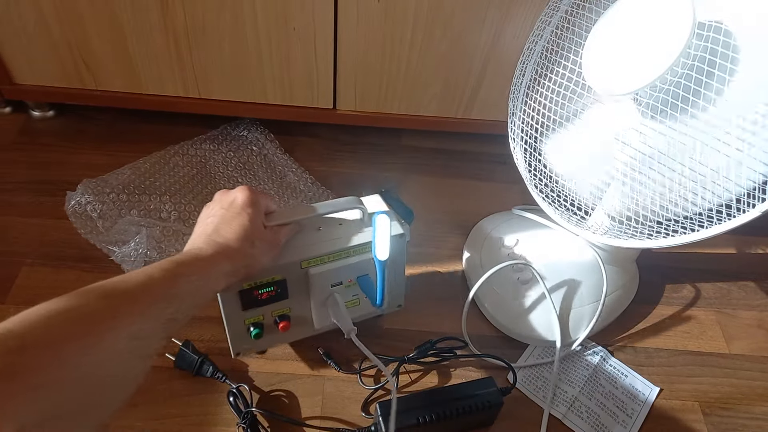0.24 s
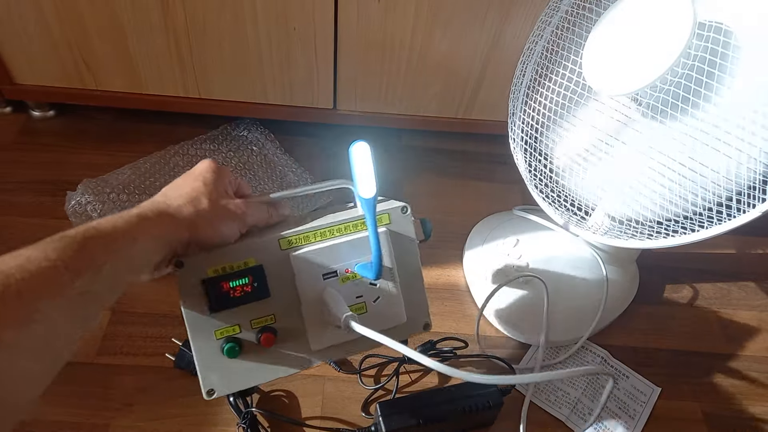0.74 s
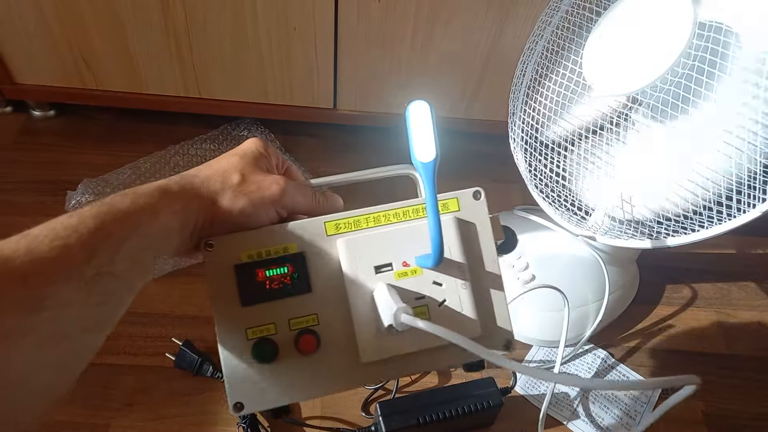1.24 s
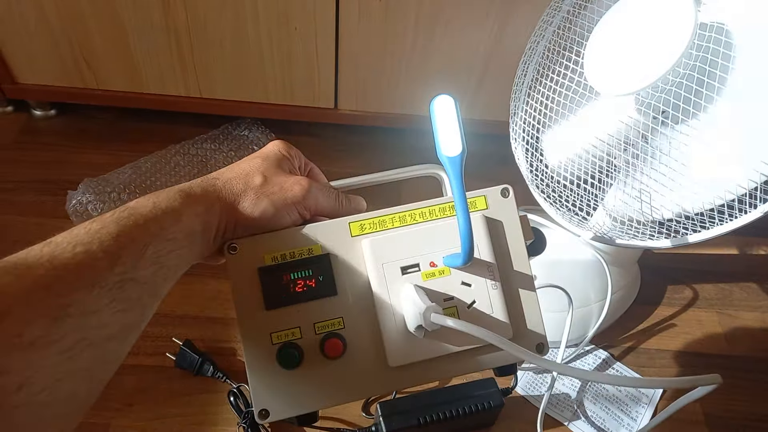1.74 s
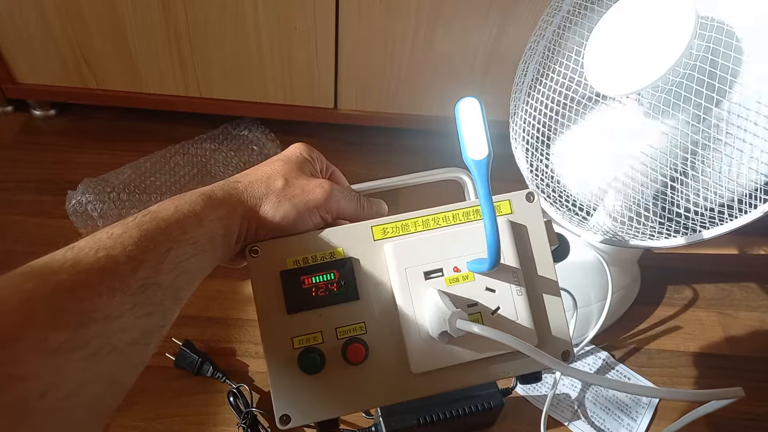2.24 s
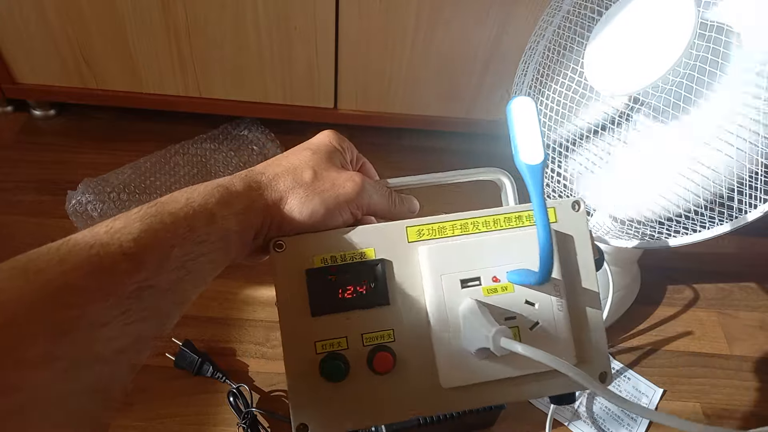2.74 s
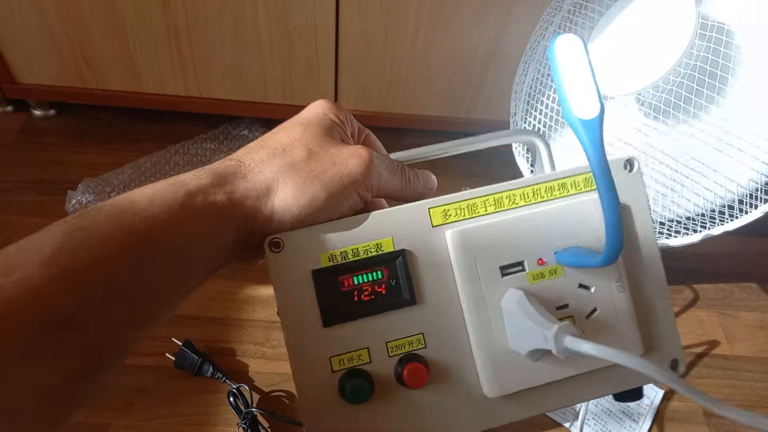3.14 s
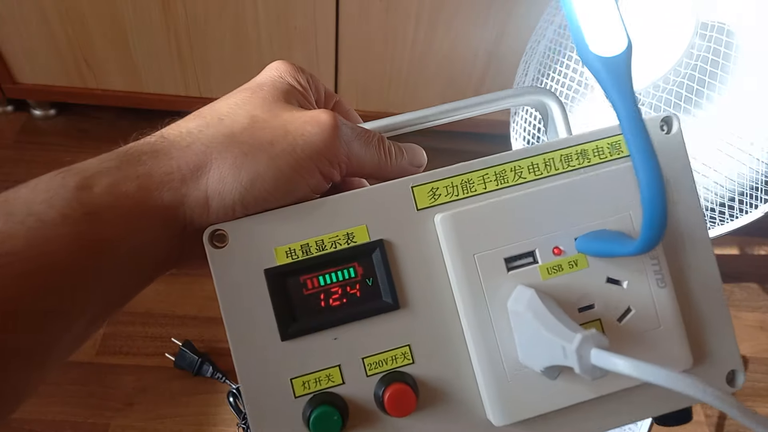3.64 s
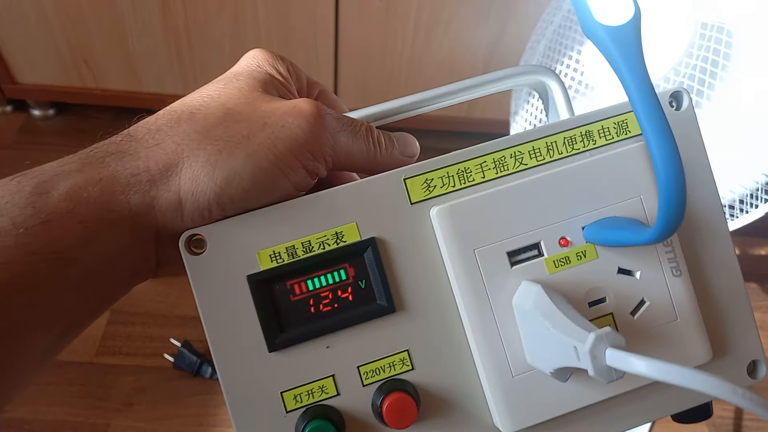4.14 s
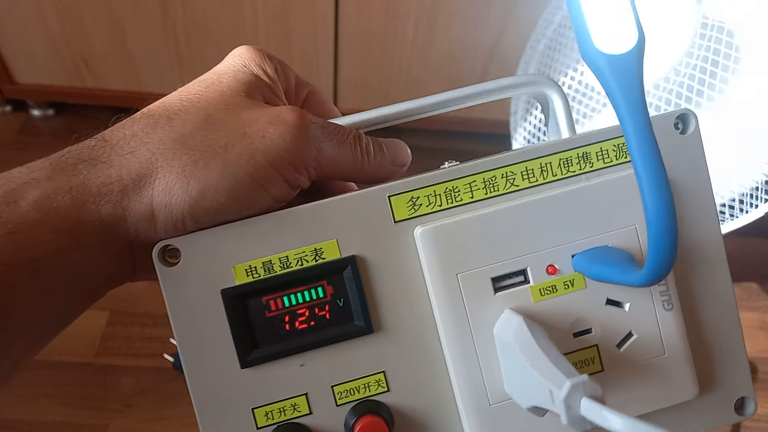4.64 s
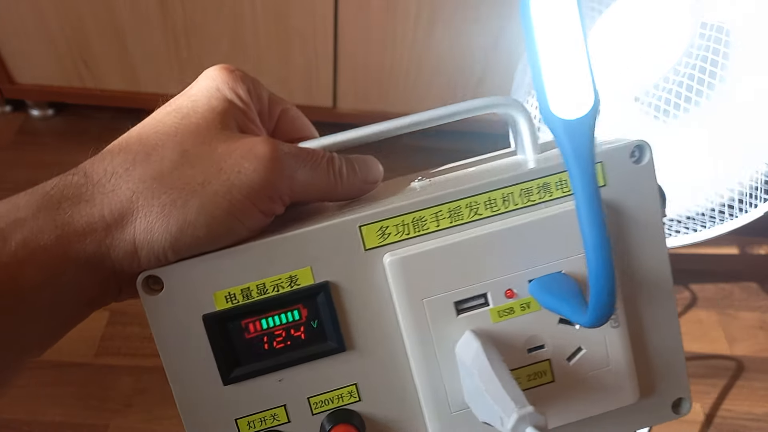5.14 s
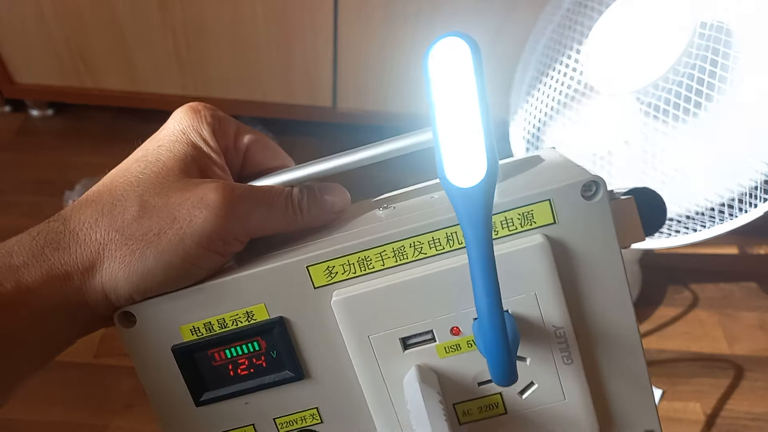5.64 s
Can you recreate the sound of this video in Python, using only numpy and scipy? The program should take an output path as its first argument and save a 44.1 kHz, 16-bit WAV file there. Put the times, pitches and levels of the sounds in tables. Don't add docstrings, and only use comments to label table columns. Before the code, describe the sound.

A small electric desk fan runs throughout in an indoor room, heard close on a hand-held stereo microphone. Its motor gives a low, nearly constant buzz around 300 Hz, throbbing quickly about thirteen times a second, under a soft, slightly fluttering rush of air through a wire cage. From 0 to 0.3 s there are crisp clicks and light rustling as a plastic box is picked up. Low draught puffs build on the left, becoming loud, blunt thumps at about 0.35-0.6 s, with a brief cable scuff near 0.45 s. The fan level sinks by 0.7 s, stays lower, then recovers from about 1.7 to 2.5 s. A tick and dull box knock come at 2.4 s, the hardest knock at 2.84 s followed by a slight dip, and a sharper double knock at 3.7 s. The hum continues steadily to the end, with dull treble and faint hiss.

```python
import sys
import numpy as np
from scipy import signal
from scipy.fft import rfft, irfft
from scipy.io import wavfile
from scipy.ndimage import uniform_filter1d, minimum_filter1d

SR = 44100
rng = np.random.default_rng(int(sys.argv[2]) if len(sys.argv) > 2 else 0)


def linear_from_db(decibels):
    return 10 ** (np.asarray(decibels, float) / 20)


def master(y):
    cut = np.clip(np.atleast_2d(y).T, -1, 1)
    pcm = np.round(cut * 32767)
    wavfile.write(sys.argv[1], SR, pcm.astype(np.int16))


N = 259308

MULTIPLES = (1, 2, 3, 4, 5, 6, 7, 8, 9, 10, 11, 13, 14, 15, 16, 17, 20, 22, 26)
# (peak level [dB], left-right difference [dB], left lead [rad])
HUM = [(-58, 2.5, 0.36), (-60, 2, 1.1), (-30.5, 4, 0.16), (-59.5, 6, 1), (-52.5, 8.5, 0.6),
       (-51.5, -6, -1.4), (-65, 4.5, -0.6), (-64, -5.5, 0.6), (-50.5, -6, 0.55), (-57.5, 2, 0.62),
       (-73.5, 8.5, -8), (-65.5, -6.5, -2.5), (-61.5, -7.5, -2.5), (-60, -2, -2.5), (-66, 3, -3.5),
       (-63.5, 10.5, 0.8), (-70.5, -2.5, 5.5), (-71, 0.5, -1.5), (-68.5, -9.5, 3.5)]
PULL = {1: (-.05, -.05), 2: (.42, -.04), 3: (-.44, 0), 4: (.36, -.14), 5: (.12, 0), 6: (-.37, 0)}
STRONG_THROB = (1, 2, 3, 4, 5, 9, 10, 15, 17)
# (below level [dB], below start [cycles], above level [dB], above start [cycles])
THROB = [(-27.5, -.04, 2.5, .01), (-7, -0.43, -6, .12), (-9, -0.055, -6, 0.34), (-4, 0.25, 1.5, 0.13),
         (-27.5, -0.67, -11.5, 0.44), (-7.5, 0.18, -11.5, -0.33), (-5, 0.4, -9.5, -.24),
         (-14, 0.0058, -8, -0.32), (-16, 0.19, -2.5, -.23)]
COMMON_THROB = (-17, 3.37, -8.5, -0.14)
TWICE_A_TURN = {1: (2, -6.5, .35), 3: (-2, -25, 0)}
# (frequency [Hz], density [dB per Hz])
AIR = [(45, -87), (80, -74.5), (115, -77), (200, -85.5), (300, -70.5), (380, -69.5), (450, -84.5),
       (700, -84.5), (2700, -92.5), (3200, -103), (5000, -106), (6400, -109), (7500, -120), (8500, -160)]
# (frequency [Hz], left-right difference [dB])
LEAN = [(60, 2.5), (200, 9.5), (400, 0.5), (700, 1), (2600, -4), (3500, 6.5), (6500, 2)]
# (frequency [Hz], likeness [0..1])
LIKENESS = [(60, 0.31), (300, 0.89), (640, 0.93), (1400, 0.27), (7000, 0.027)]
# (frequency [Hz], width [Hz], level [dB])
NARROW_BANDS = [(2118, 27, 6), (2400, 45, 2), (2573, 7.3, -2), (3690, 51, -1.5), (4150, 8.3, -5.5),
                (5320, 25, -5.2), (6020, 100, -1.9)]
# (start [s], length [s], peak level [dB], brightness [Hz])
PUFFS = [(0., 0.09, -11.5, 87), (0.085, 0.148, -13, 75.4), (0.222, 0.083, -14.5, 76.5),
         (0.331, 0.049, -7, 114.3), (0.365, 0.0513, 3, 120), (0.428, 0.025, -5.5, 236),
         (.444, .036, 0.5, 275), (0.488, 0.043, -4, 201), (0.517, .034, -4.5, 233),
         (0.546, 0.043, -2.5, 298), (.564, 0.0323, -3, 264), (0.585, 0.09, -16.5, 130),
         (2.327, 0.06, -39.5, 89.5), (2.822, 0.067, -37.5, 89.2), (.49, 0.15, -8, 94.3)]
# (time [s], peak level [dB], centre [Hz], t60 [s], left-right difference [dB])
CLICKS = [(0., -32, 2800, 0.39, 1), (0.017, -35.5, 6450, 0.32, 1), (0.0266, -19, 3230, 0.2, 5),
          (0.0501, -17, 2870, 0.22, 4), (0.2633, -43, 3600, 0.095, 12), (0.2886, -34, 4620, .1, 11),
          (2.367, -41, 6330, .14, 17), (2.366, -51, 4900, 0.13, 9), (2.84, -38.5, 1490, .1, 2),
          (.2886, -43.5, 6240, 0.23, 19.5), (3.687, -35.5, 1590, 0.079, 4.5)]
# (time [s], peak level [dB], dullness [Hz], left-right difference [dB])
KNOCKS = [
    (2.397, -31, 800, 3),
    (2.841, -23.5, 650, 2.5),
    (3.687, -25.5, 1600, 6),
    (3.711, -31.5, 1710, 3.5),
]
# (frequency [Hz], level [dB], t60 [s])
BOX = [(501, -4.5, 0.11), (606, 7.5, 0.052), (716, -2, 0.17), (945, -9, 0.16), (1090, -36, 0.054),
       (1473, -0.5, 0.23), (2155, -14.5, 0.054)]
# (start [s], fall [s], depth [dB], release [s], recovery time constant [s])
DUCKS = [
    (0.399, .3, -10, 1.715, 0.35),
    (1.52, 0.12, -0.5, 1.9, 0.087),
    (2.841, 0.69, -1.7, 3.45, .15),
]
# (frequency [Hz], density [dB per Hz])
HISS = [(7200, -136), (9000, -128), (13500, -122), (14300, -119), (14800, -108), (16000, -107)]

BUZZ_HZ, TURN_HZ = 100.213, 13.10
LIFT_S, LIFT_FADE_S = 0.37, 0.081
BOARDS_DB, BOARDS_550_DB, BOARDS_LEAN_DB = 2.5, 7, 0.5
BOARDS_DULL_DB = -3.5
SHADE_START_S, SHADE_END_S, SHADE_DB = 3.6, 3.95, -1
SLACK_FADES = 0.58
AIR_FOLLOWS = 1.104
RUSTLE_DB, RUSTLE_END_S = 3, 0.63
SUCK = 0.23
TAIL_DB, DRIER_PER_DB = -4.5, 0.23
RUB_START_S, RUB_LENGTH_S = .41, .07
PORT_HZ, PORT_WIDTH_HZ, PORT_GAIN = 6520, 740, 1.6
VOICE_BAND_HZ, RUMBLE_CUT_HZ, TOP_HZ = 6800, 66, 15760
LIMIT, LIMIT_S = .97, .004


def rms_one(x):
    return x / np.sqrt(np.mean(x ** 2) + 1e-20)


def at_hz(points, hz):
    table_hz, values = np.array(points).T
    return np.interp(np.log(hz), np.log(table_hz), values)


def sides(db):
    return linear_from_db(np.array([db / 2, -db / 2]))


def sos(x, sections):
    return signal.sosfilt(sections, x)


def low_pass(x, hz, order):
    return sos(x, signal.butter(order, hz, fs=SR, output="sos"))


def band(x, low_hz, high_hz, order=2):
    edges_hz = [low_hz, min(high_hz, .45 * SR)]
    return sos(x, signal.butter(order, edges_hz, "band", fs=SR, output="sos"))


def resonance(x, hz, width_hz):
    r = np.exp(-np.pi * width_hz / SR)
    feedback = [1, -2 * r * np.cos(2 * np.pi * hz / SR), r * r]
    return signal.lfilter(np.array([1, 0, -1]) * (1 - r * r) / 2, feedback, x)


def drift(rate, channels=1):
    r = np.exp(-128 * np.pi * rate / SR)
    chance = rng.standard_normal((channels, N // 64 + 1002))
    slow = signal.lfilter([1], [1, -2 * r, r * r], chance)[:, 1000:]
    return np.array([np.interp(np.arange(N) / 64, np.arange(len(v)), rms_one(v)) for v in slow])


def coloured(spectrum, lean=((1, 0), (2, 0))):
    hz = np.maximum(np.fft.rfftfreq(N, 1 / SR), 1)
    mid, side = rfft(rng.standard_normal((2, N))) * np.sqrt(SR / 4)
    alike = np.clip(at_hz(LIKENESS, hz), 0, 1)
    pair = np.sqrt(1 + alike) * mid + np.sqrt(1 - alike) * side * [[1], [-1]]
    return irfft(pair * linear_from_db(at_hz(spectrum, hz)) * sides(at_hz(lean, hz)), N)


def gain_control():
    t = np.arange(N) / SR
    gain_db = np.zeros(N)
    for start, fall, db, release, recover in DUCKS:
        falling = np.clip((t - start) / fall, 0, 1)
        gain_db += db * falling * np.exp(-np.maximum(t - release, 0) / recover)
    return gain_db


def slack(depth_db, recover_s):
    turns = (np.arange(1, N / SR * TURN_HZ) - .03) / TURN_HZ
    at = (np.ceil(turns * BUZZ_HZ + .08) - .08) / BUZZ_HZ - .001
    drops = np.zeros(N)
    drops[(at * SR).astype(int)] = -depth_db * rng.uniform(0.084, 0.9, len(at))
    sag = signal.lfilter([1], [1, -np.exp(-1 / (recover_s * SR))], drops)
    return uniform_filter1d(sag - sag.mean(), 40)


def motor(wander_db, flutter_db):
    t, out = np.arange(N) / SR, np.zeros((2, N))
    low = np.clip(.5 - (t - LIFT_S) / LIFT_FADE_S, 0, 1)
    up = np.clip((t - SHADE_START_S) / (SHADE_END_S - SHADE_START_S), 0, 1)
    turn = np.exp(2j * np.pi * TURN_HZ * t)
    flutter = flutter_db * drift(8.3)
    sag_db = slack(depth_db=5.5, recover_s=0.029)
    throb = dict(zip(STRONG_THROB, THROB))
    for k, (db, pan_db, lead) in zip(MULTIPLES, HUM):
        below_db, below, above_db, above = throb.get(k, COMMON_THROB)
        beat = 1 + linear_from_db(below_db) * np.exp(2j * np.pi * below) / turn
        beat = beat + linear_from_db(above_db) * np.exp(2j * np.pi * above) * turn
        if k in TWICE_A_TURN:
            turns_off, side_db, start = TWICE_A_TURN[k]
            beat = beat + linear_from_db(side_db) * np.exp(2j * np.pi * start) * turn ** turns_off

        phase, creep = PULL.get(k, (rng.random(), 0))
        tone = beat * np.exp(2j * np.pi * ((k * BUZZ_HZ + creep) * t + phase))
        pair = np.real(tone * np.exp(.5j * lead * np.array([[1], [-1]])))

        boards_db = BOARDS_550_DB * low * (k in (5, 6)) + BOARDS_DULL_DB * low * (k in (9, 10))
        shade_db = SHADE_DB * (up - .5) * min(k / 10, 1.2) * (k > 4)
        if k == 3:
            loose_db = sag_db * (1 - SLACK_FADES * up)
        else:
            loose_db = np.sqrt(k) * wander_db * drift(4.0, channels=2)
        out += pair * linear_from_db(db + boards_db + shade_db + loose_db) * sides(pan_db)[:, None]
    level_db = gain_control() + BOARDS_DB * low + flutter
    return out * linear_from_db(level_db) * sides(BOARDS_LEAN_DB * low - .7)


def air(patchy_db, turn_db, buzz_depth):
    t, out = np.arange(N) / SR, 0
    noise = coloured(AIR, LEAN)
    noise[0] = np.roll(noise[0], 5)
    spectrum, hz = rfft(noise), np.fft.rfftfreq(N, 1 / SR)
    edges = 35 * 2 ** np.arange(0, 8.1, .5)
    together = drift(10.0)
    for low, high in zip(edges, edges[1:]):
        part = irfft(spectrum * ((hz >= low) & (hz < high)), N)
        turn = turn_db * np.cos(2 * np.pi * (TURN_HZ * t - .15)) * (low > 600)
        gate = 1 + buzz_depth * np.cos(2 * np.pi * BUZZ_HZ * t) * (1200 < low < 3000)
        rustle = RUSTLE_DB * np.clip((RUSTLE_END_S - t) / 0.11, 0, 1) * (low > 2000)
        patches = patchy_db * (0.55 * together + drift(12.0, channels=2))
        out = out + part * gate * linear_from_db(turn + rustle + patches)
    for centre_hz, width_hz, db in NARROW_BANDS:
        fitful = linear_from_db(db - 4.5 + 5 * drift(3.1, channels=2))
        out = out + fitful * resonance(noise, centre_hz, width_hz)
    return out * linear_from_db(AIR_FOLLOWS * gain_control())


def draught(evenness, leak_db):
    out = np.zeros(N)
    for start, length, db, hz in PUFFS:
        i, n = round(start * SR), round(length * SR)
        noise = signal.lfilter([1], [1, -.99], rng.standard_normal(12000))
        lump = low_pass(band(noise, 75, 900), hz, order=3)[4000:]
        lump = lump / uniform_filter1d(np.abs(signal.hilbert(lump)), 500) ** evenness
        puff = lump[1000:1000 + n] * np.hanning(n) ** 0.63
        puff = low_pass(np.pad(puff, (0, 900)), 1.67 * hz, order=4)
        out[i:i + len(puff)] += linear_from_db(db) * puff / np.abs(puff).max()
    return (out - SUCK * out ** 2) * linear_from_db([[0], [leak_db]])


def clicks():
    out, t = np.zeros((2, N)), np.arange(12000) / SR
    for s, db, hz, t60, pan_db in CLICKS:
        noise = rng.standard_normal((2, len(t)))
        wide = 2.1 if 2000 < hz < 4800 else 1.12
        crack = band(noise[0] * linear_from_db(-60 * t / 0.0058), hz / wide, hz * wide)
        crack = crack + 1.4 * resonance(crack, hz, 350)
        tail_db = TAIL_DB - DRIER_PER_DB * pan_db - 8.0 - 60 * t / t60
        tail = rms_one(band(noise, hz / wide ** 1.3, hz * wide ** 0.26)) * linear_from_db(tail_db)
        click = crack / np.abs(crack).max() + tail
        i = round(s * SR)
        out[:, i:i + len(t)] += linear_from_db(db) * click * sides(pan_db)[:, None]
    return low_pass(out, 7500, order=2)


def rub(db, top_db):
    progress = np.clip((np.arange(N) / SR - RUB_START_S) / RUB_LENGTH_S, 0, 1)
    shape = np.sin(np.pi * progress) ** 2
    noise = rng.standard_normal((2, N))
    low = rms_one(band(noise, 2700, 8300)) * sides(4.5)[:, None]
    top = linear_from_db(top_db) * rms_one(band(noise, 13600, 15600))
    return linear_from_db(db) * shape * (low + top)


def knocks(room_db, room_t60):
    out, t = np.zeros((2, N)), np.arange(9000) / SR
    for s, db, dull_hz, pan_db in KNOCKS:
        chance_db = rng.normal(0, 1.3, (len(BOX), 2))
        rings = 0
        for (hz, mode_db, t60), extra_db in zip(BOX, chance_db):
            decay = linear_from_db(mode_db + extra_db[:, None] - 60 * t / t60)
            rings = rings + decay * np.sin(2 * np.pi * hz * t) / (1 + (hz / dull_hz) ** 2)
        rings = low_pass(rings / np.abs(rings).max(), 0.89 * dull_hz, order=4)
        tail = rms_one(band(rng.standard_normal((2, len(t))), 440, dull_hz, order=5))
        tail = tail * linear_from_db(room_db - 60 * t / room_t60) * np.minimum(t / 0.002, 1)
        i = round(s * SR)
        out[:, i:i + len(t)] += linear_from_db(db) * (rings + tail) * sides(pan_db)[:, None]
    return out


def limited(x):
    size = round(LIMIT_S * SR)
    need = minimum_filter1d(np.minimum(1, LIMIT / (np.abs(x) + 1e-9)), size=2 * size)
    return x * uniform_filter1d(uniform_filter1d(need, size=size), size=size)


def scene():
    fan = motor(wander_db=0.42, flutter_db=0.91) + air(patchy_db=2.0, turn_db=0.5, buzz_depth=0.22)
    wind = draught(evenness=0.99, leak_db=-55.5)
    handling = clicks() + rub(db=-56, top_db=-8.5) + knocks(room_db=-12.0, room_t60=0.21)
    return fan + wind + handling


def top_cut(x):
    return signal.sosfilt(signal.butter(12, 17130, fs=SR, output="sos"), x)


def record(dry):
    heard = dry + [[PORT_GAIN], [.3]] * resonance(dry, PORT_HZ, PORT_WIDTH_HZ)
    heard = sos(heard, signal.butter(5, RUMBLE_CUT_HZ, "high", fs=SR, output="sos"))
    kept = sos(heard, signal.ellip(8, .5, 60, VOICE_BAND_HZ, fs=SR, output="sos"))
    bright = np.sqrt(uniform_filter1d(band(kept, 4500, 7700) ** 2, 70).mean(axis=0) + 1e-14)
    hiss = coloured(HISS) * linear_from_db(gain_control()) + linear_from_db(-9) * bright ** 1.42 * rng.standard_normal(N)
    hiss = sos(hiss, signal.ellip(10, .5, 70, [7400, TOP_HZ], "band", fs=SR, output="sos"))
    top = sos(dry, signal.ellip(8, .5, 70, [13000, TOP_HZ], "band", fs=SR, output="sos"))
    return top_cut(limited(kept + hiss + top))


dry = scene()
out = record(dry)
master(out)
```